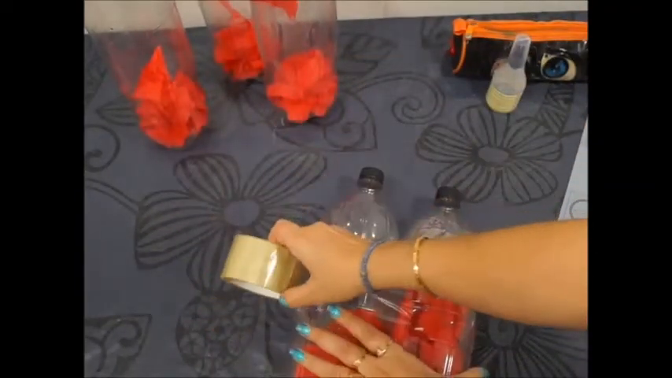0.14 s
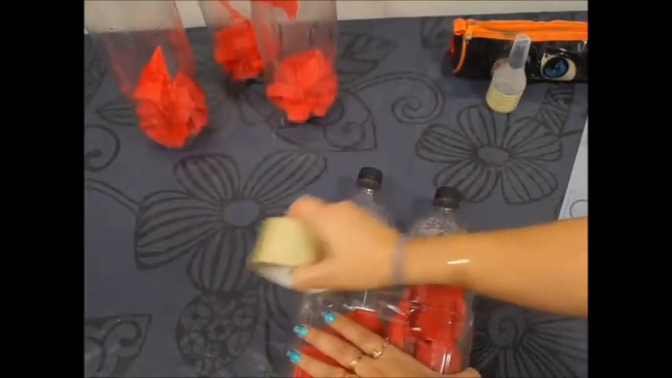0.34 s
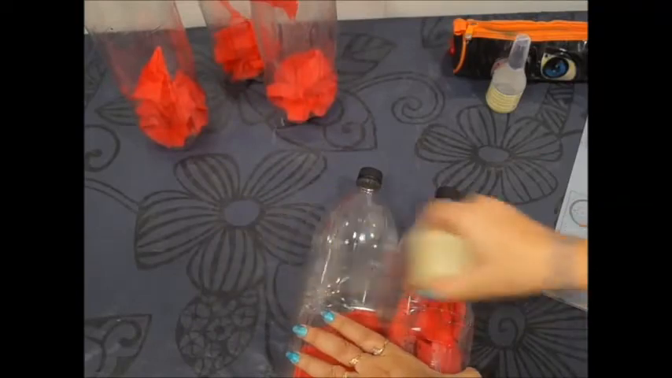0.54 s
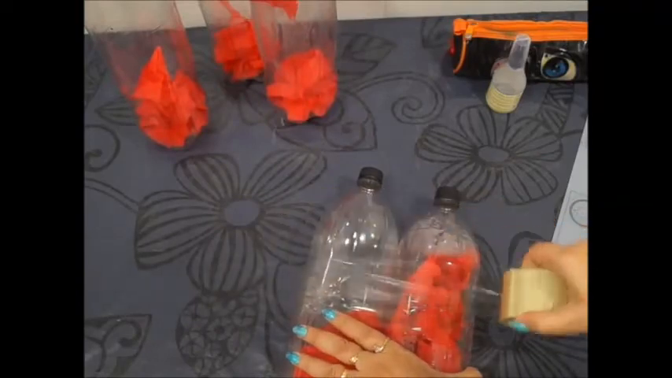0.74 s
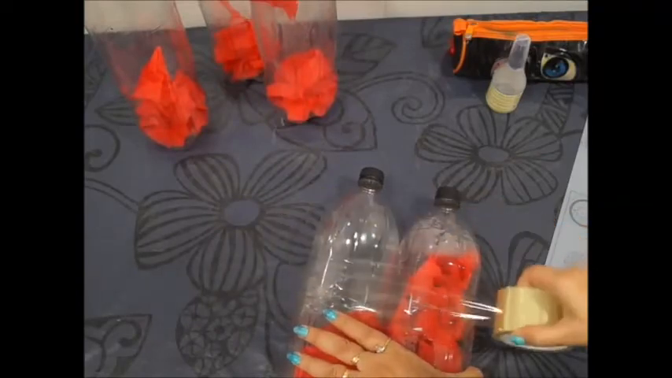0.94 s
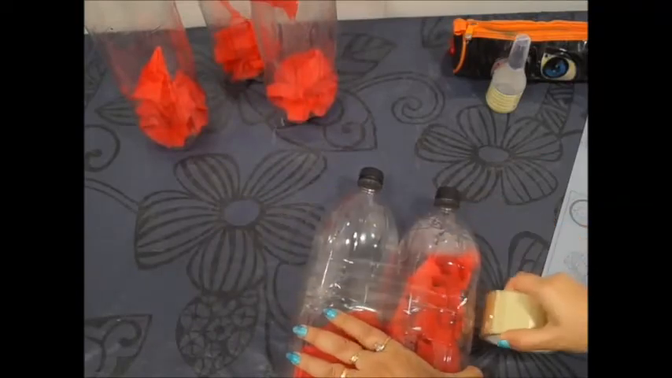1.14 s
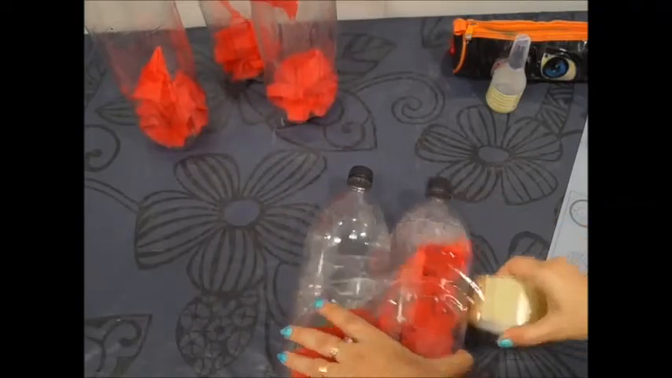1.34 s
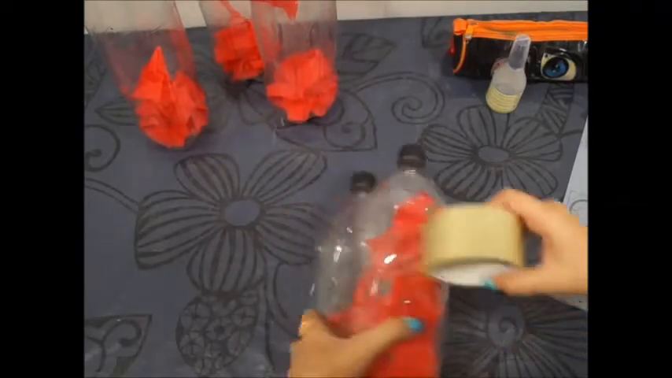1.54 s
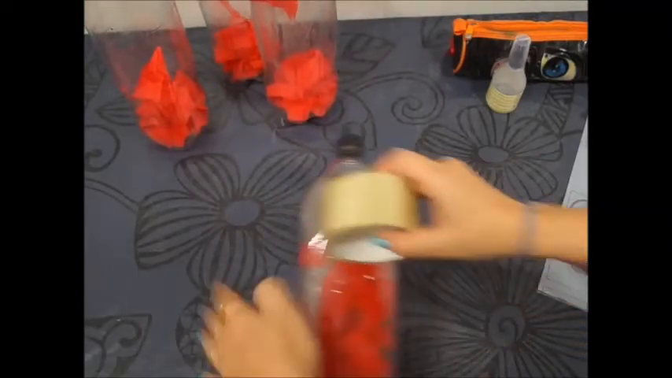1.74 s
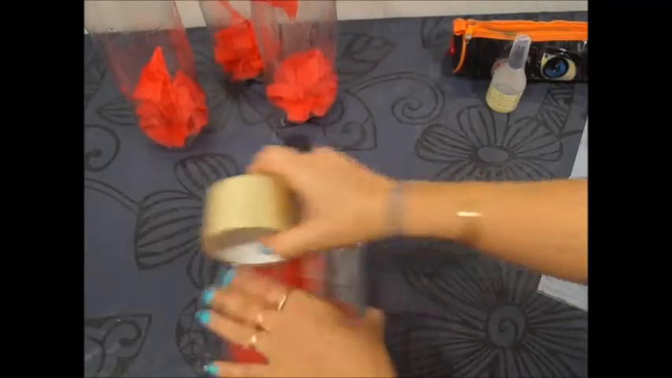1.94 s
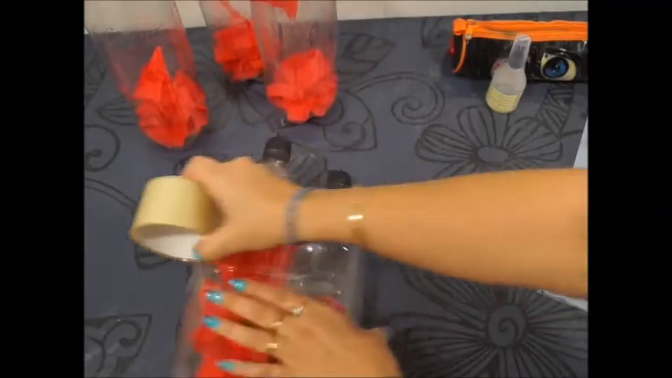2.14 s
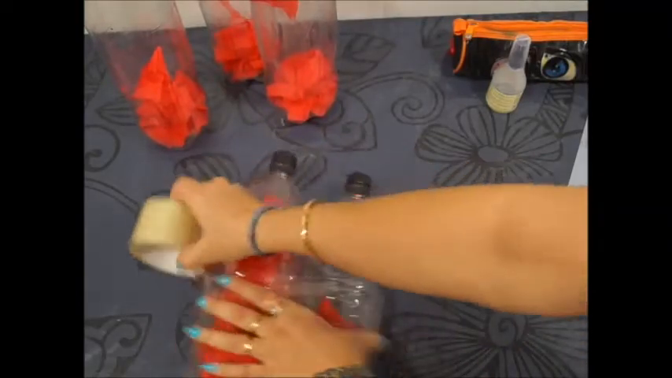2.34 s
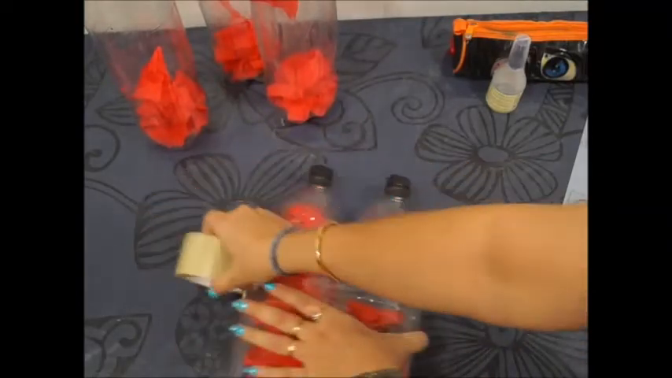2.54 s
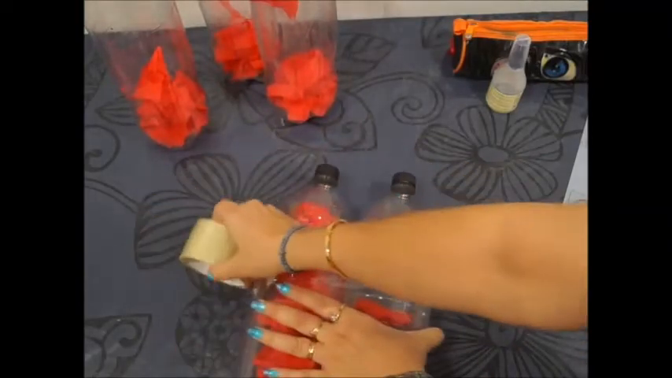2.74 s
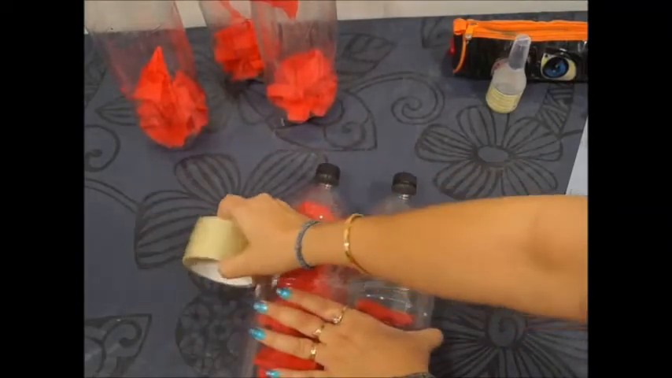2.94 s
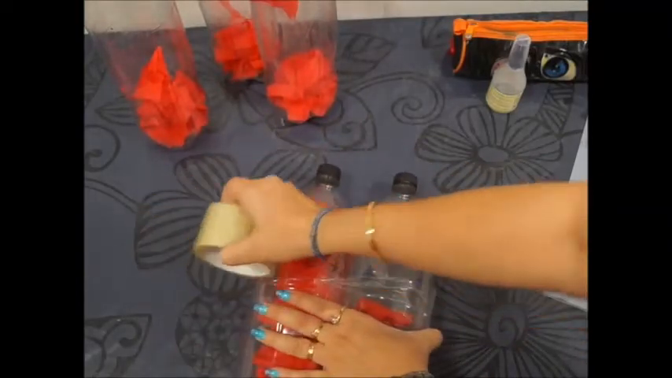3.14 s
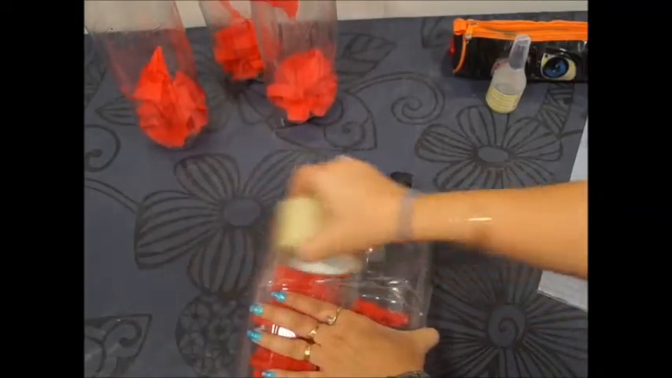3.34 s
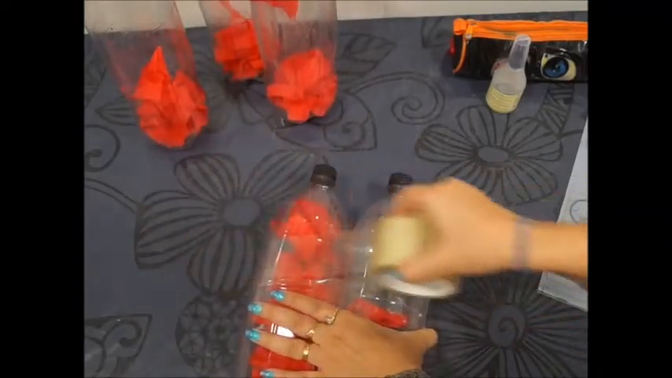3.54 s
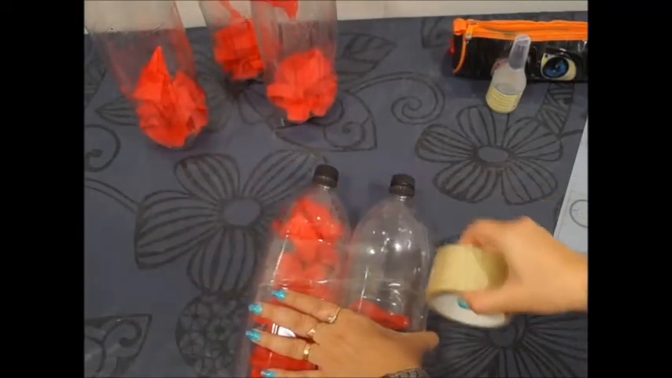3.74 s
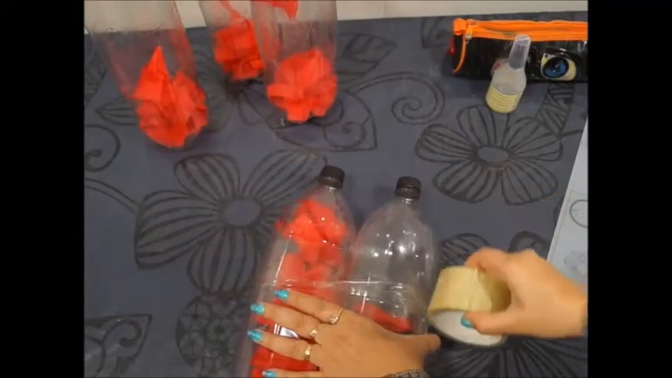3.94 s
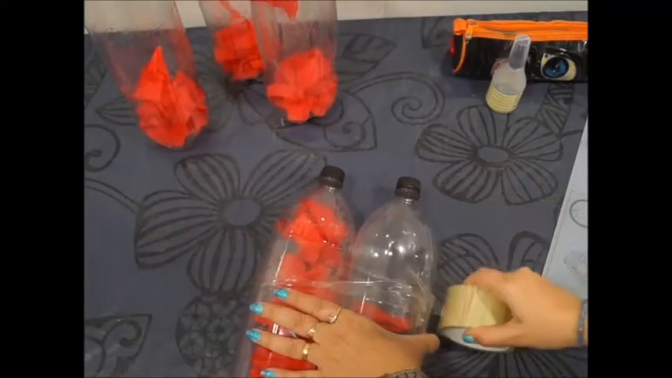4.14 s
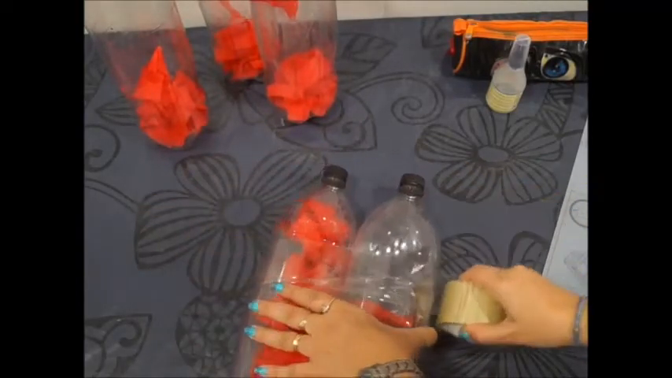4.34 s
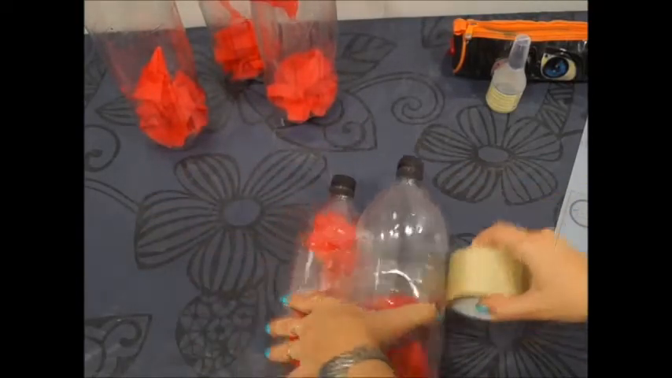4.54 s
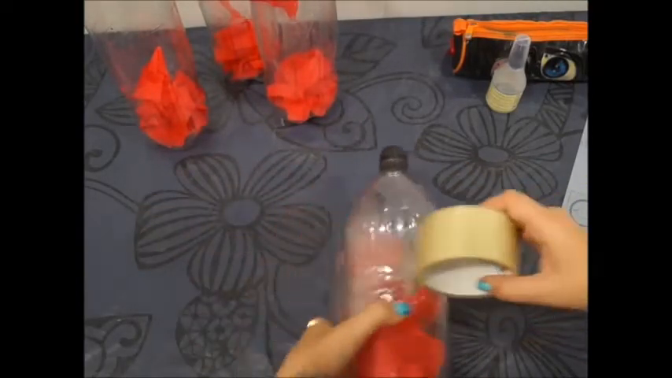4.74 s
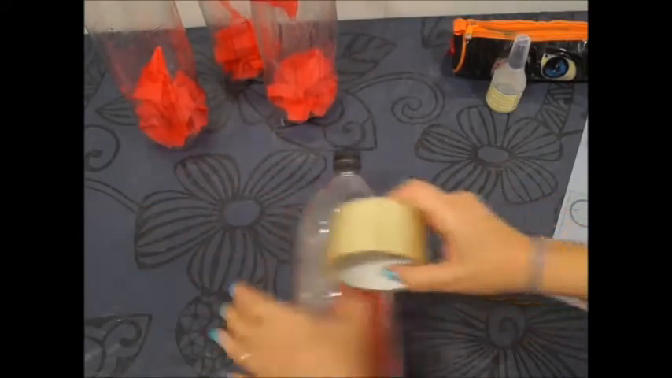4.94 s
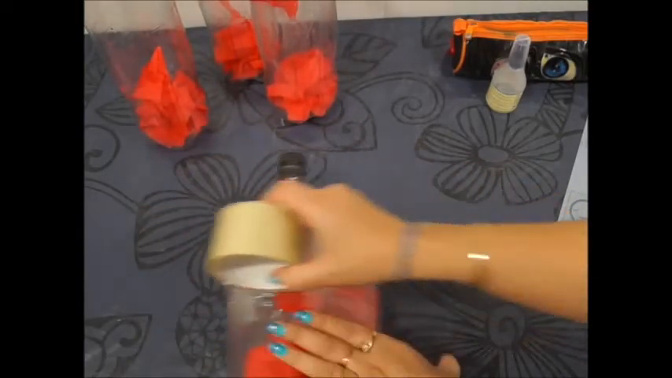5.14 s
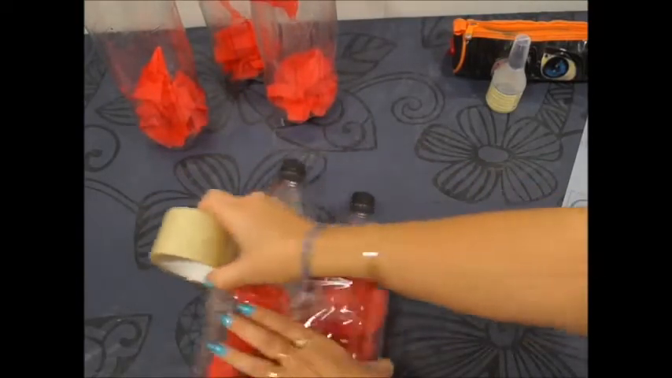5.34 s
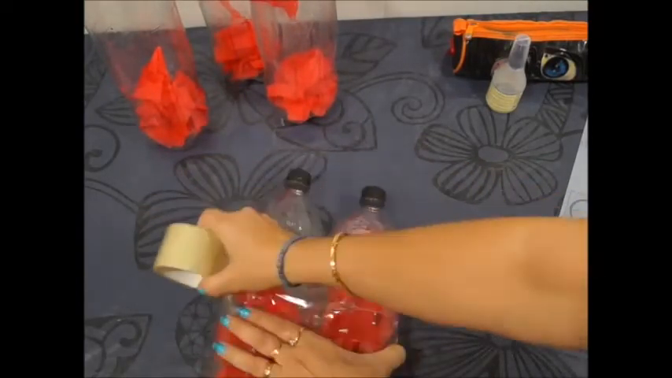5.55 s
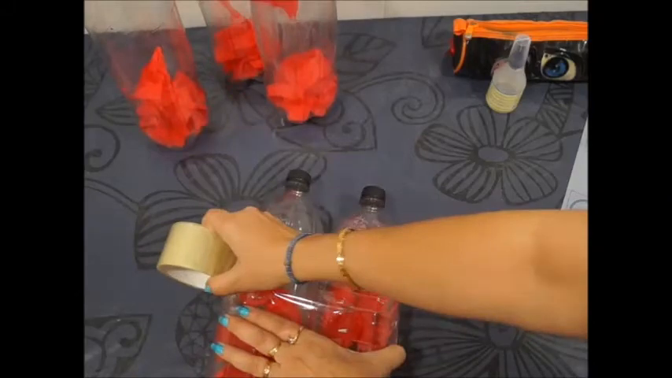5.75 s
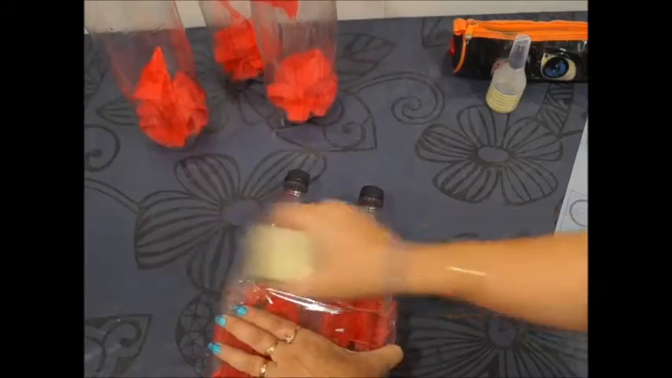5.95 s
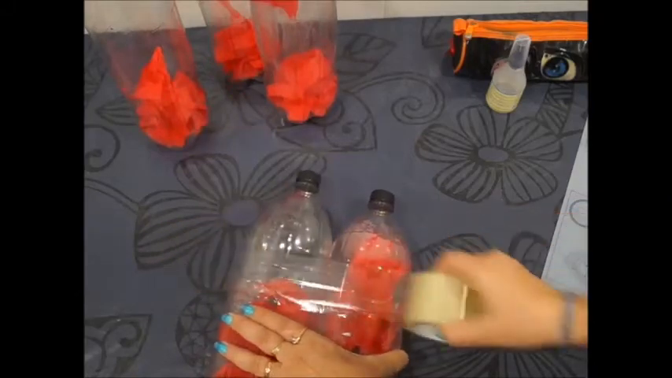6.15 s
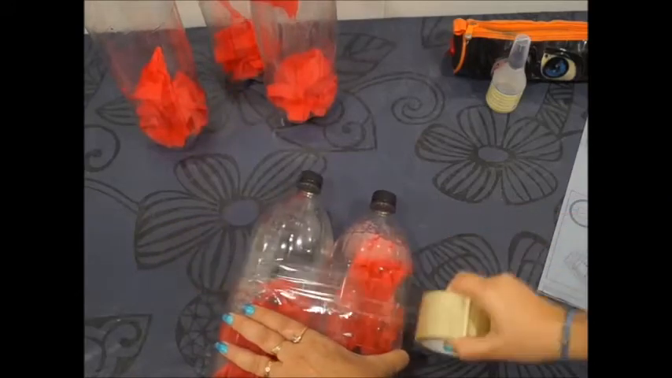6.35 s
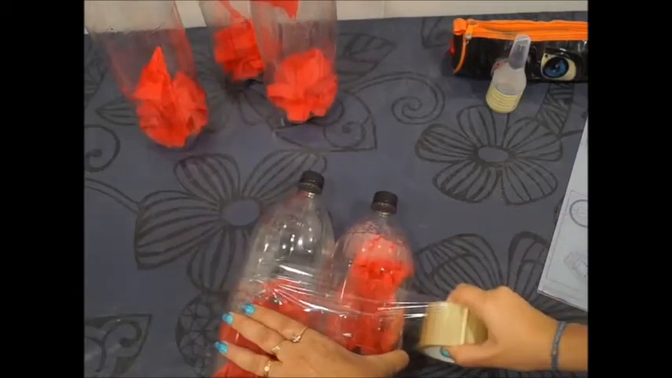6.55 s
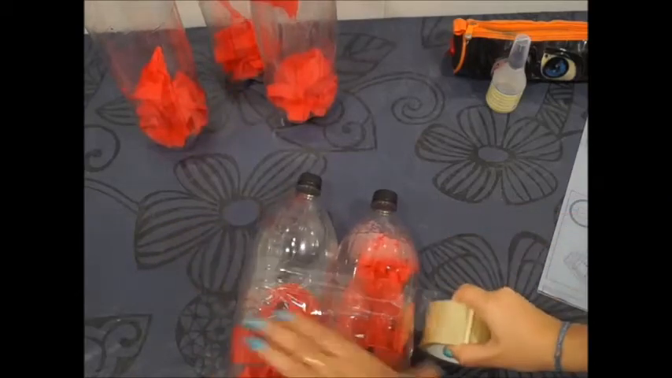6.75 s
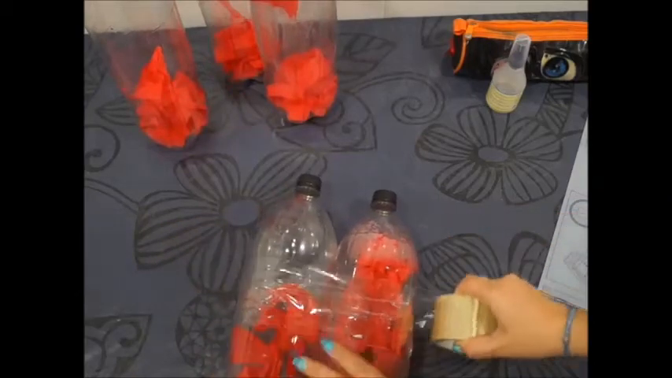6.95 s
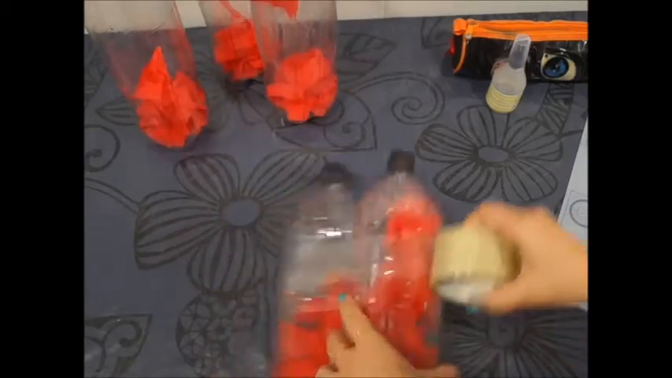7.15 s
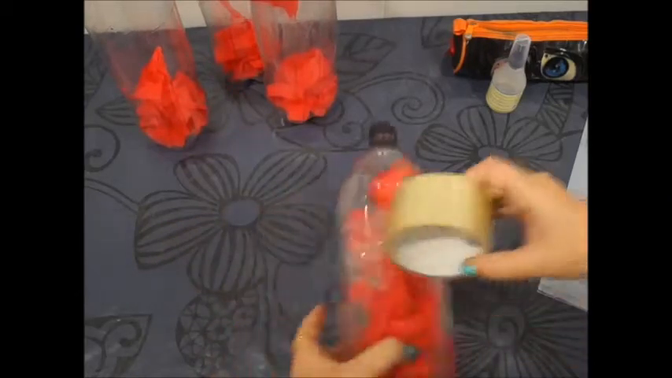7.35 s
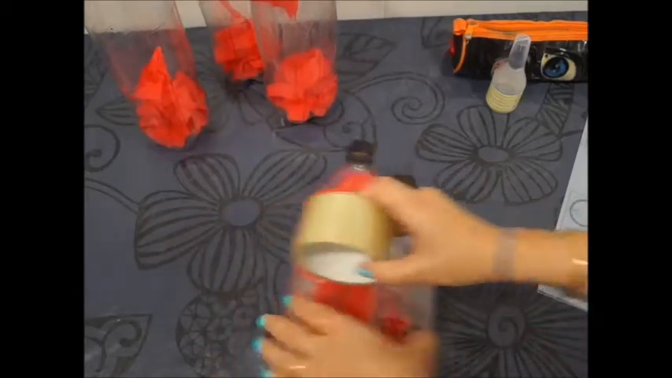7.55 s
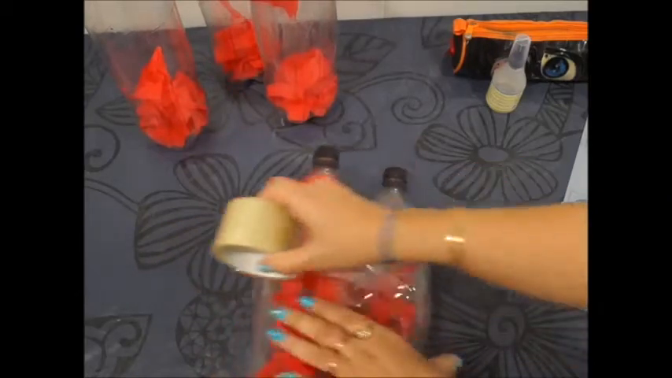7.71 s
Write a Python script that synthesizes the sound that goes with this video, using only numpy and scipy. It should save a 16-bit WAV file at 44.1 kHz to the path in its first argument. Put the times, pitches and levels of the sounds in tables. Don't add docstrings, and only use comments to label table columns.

```python
import sys
import numpy as np
from scipy import signal
from scipy.fft import rfft, irfft
from scipy.io import wavfile
from scipy.ndimage import uniform_filter1d

SR = 44100
rng = np.random.default_rng(int(sys.argv[2]) if len(sys.argv) > 2 else 0)


def rack_gain(trim_db):
    fader = np.asarray(trim_db, float)
    return 10 ** (fader / 20)


def bounce(signal):
    frames = np.transpose(np.atleast_2d(signal))
    limited = np.clip(frames, -1, 1)
    pcm = np.round(limited * 32767).astype(np.int16)
    wavfile.write(sys.argv[1], SR, pcm)


N = 343098


def unit_rms(x):
    return x / np.sqrt(np.mean(x ** 2) + 1e-20)


def at_hz(points, hz, column=1):
    points = np.array(points)
    return np.interp(np.log(hz), np.log(points[:, 0]), points[:, column])


def colour(x, spectrum):
    hz = np.arange(1, 2050) * SR / 4096
    cepstrum = irfft(np.log(rack_gain(at_hz(spectrum, hz))))
    cepstrum[1:2048] *= 2
    cepstrum[2049:] = 0
    kernel = irfft(np.exp(rfft(cepstrum)))[:2048]
    return signal.oaconvolve(x, kernel / np.linalg.norm(kernel))[:N]


def drift(rate_hz):
    r = np.exp(-2 * np.pi * rate_hz / SR)
    return unit_rms(signal.lfilter([1], [1, -2 * r, r * r], rng.standard_normal(N)))


def grains(per_s, spread_db):
    size_db = spread_db * np.minimum(rng.exponential(1, N), 5)
    sizes = rack_gain(size_db) * rng.choice([-1, 1], N)
    return unit_rms(sizes * (rng.random(N) < per_s / SR))


# pitch in Hz, width in Hz, level in dB.
BOTTLES = [(807.4, 71, -1), (1072, 52, -4), (1340, 45, -6.5), (1580, 142, -7), (2050, 20, -4.5),
           (2400, 34, -18)]


def bottles(x, ring_db):
    out = x
    for hz, width_hz, db in BOTTLES:
        r = np.exp(-np.pi * width_hz / SR)
        b = np.array([1, 0, -1]) * (1 - r * r) / 2
        a = [1, -2 * r * np.cos(2 * np.pi * hz / SR), r * r]
        out = out + rack_gain(db + ring_db) * signal.lfilter(b, a, x + 1e-18)
    return out


# start in seconds, end in seconds, level in dB, slips per second in Hz, evenness in dB.
RUNS = [(0.292, 0.371, -21, 1030, 3.5), (0.369, .412, -23, 1400, 3), (.412, 0.45, -21.5, 2058, 4),
        (.45, .533, -21, 1452, 3), (0.53, 0.564, -21.5, 1000, 0), (3.0463, 3.166, -23, 1000, -0.5),
        (3.177, 3.226, -25.5, 902.4, -1.5), (3.228, 3.321, -21, 1200, 1), (3.326, 3.373, -23.5, 1340, -1),
        (3.396, 3.448, -23.5, 1104, -1.5), (3.456, 3.53, -26.5, 1000, -2), (5.864, 5.992, -22.5, 1148, 0.5),
        (5.992, 6.059, -22.5, 1337, 1), (6.058, 6.125, -25.5, 1402, 0)]
# start in seconds, length in ms, level in dB, slips per second in Hz.
JERKS = [(.588, 14.6, -19.5, 1340), (.641, 21.4, -22, 1301), (.687, 17, -20.5, 1388),
         (.729, 23.4, -24, 892.3), (.767, 10.7, -27.5, 1102), (3.533, 19.7, -19.5, 1553),
         (3.572, 21.3, -21.5, 1543), (3.623, 25.9, -20, 1200), (3.658, 22.1, -27, 1100),
         (3.68, 20.4, -19.5, 1200), (3.722, 5.53, -26, 1000), (3.743, 8, -31, 1000),
         (6.137, 20.4, -17, 1254), (6.172, 18, -23.5, 1200), (6.199, 16.35, -30, 1103),
         (6.237, 8.75, -24, 1200)]
# start in seconds, length in ms, level in dB.
CREEPS = [
    (.276, 16.8, -48),
    (.284, 7.9, -34),
    (3.037, 5, -48),
    (3.993, 6.84, -49.5),
    (5.49, 29, -55),
    (5.762, 18.85, -57),
    (7.428, 24, -47),
]
# start in seconds, length in ms, level in dB, slips per second in Hz, film against crackle in dB.
TUGS = [
    (4.0189, 13.1, -16.5, 900, -3),
    (4.038, 21.8, -19, 1000, -1.5),
    (4.066, 26, -22, 749, 2),
    (5.783, 9.85, -31.5, 1000, 2),
    (5.798, 12.16, -31.5, 1000, -7),
    (5.825, 15.2, -16.5, 1097, 2.5),
    (6.4143, 10, -16.5, 902, -1.5),
    (6.431, 5, -9, 902, -8),
    (6.446, 25.8, -21, 899, -0.5),
    (7.455, 17.7, -29, 520, -5.5),
]
RUN_BUZZ_DB, RUN_RASP_DB, EVEN_SILENCES_RASP = -4.5, -2, 2.65
JERK_BUZZ_DB, JERK_RASP_DB = -6.5, -0.37
CREEP_HZ = 1000


def peel_rows():
    rows = []
    for start, end, db, hz, even_db in RUNS:
        buzz_db = db + RUN_BUZZ_DB + even_db
        rasp_db = db + RUN_RASP_DB - EVEN_SILENCES_RASP * even_db
        rows.append((start, end, db, buzz_db, hz, rasp_db))
    short = [row + (CREEP_HZ, 0) for row in CREEPS] + [row + (0,) for row in JERKS] + TUGS
    for start, ms, db, hz, film_db in short:
        film = db + film_db
        rows.append((start, start + ms / 1000, db, film + JERK_BUZZ_DB, hz, film + JERK_RASP_DB))
    return rows


# frequency in Hz, level in dB per Hz.
CRACKLE = [(100, -68), (500, -37.5), (1200, -19.5), (2200, -5.5), (4500, -5.5), (7000, -8.5), (11000, -11)]
# frequency in Hz, level in dB per Hz.
BUZZ = [(80, -71), (300, -37), (700, 1), (1000, -2), (1600, -5), (2500, -14), (4000, -14.5), (11000, -36)]
# frequency in Hz, level in dB per Hz.
RASP = [(40, -38), (120, -18.5), (300, -10), (600, -5), (900, -2), (1600, -3), (2500, -4), (5000, -14),
        (11000, -47.5)]


def peeling():
    t = np.arange(N) / SR
    levels = np.zeros((3, N))
    slip_hz = np.full(N, 1000.)
    for start, end, crackle_db, buzz_db, hz, rasp_db in peel_rows():
        near = slice(round(start * SR) - 100, round(end * SR) + 100)
        inside = np.minimum(t[near] - start, end - t[near])
        gate = np.clip(inside / 0.00093 + .5, 0, 1)
        levels[:, near] += gate * rack_gain(np.array([[crackle_db], [buzz_db], [rasp_db]]))
        slip_hz[round(start * SR):round(end * SR)] = hz
    unsteady = rack_gain(.7 * drift(30) + .8 * drift(300))
    turns = np.cumsum(slip_hz * unsteady / SR)
    jerks = np.diff(np.floor(turns), prepend=0)
    even = unit_rms(jerks - uniform_filter1d(jerks, size=120))
    uneven = unit_rms(jerks * rng.standard_normal(N))
    threads = unit_rms(grains(8000, 3.3) * (.4 + np.cos(np.pi * turns) ** 2))
    crackle, buzz, rasp = levels * rack_gain(2.2 * drift(50) + 1.8 * drift(130))
    film = colour(buzz * even, BUZZ) + colour(rasp * uneven, RASP)
    return colour(crackle * threads, CRACKLE) + bottles(film, ring_db=7.5)


# time in seconds, peak in dB, dull part in dB, length in ms, brightest frequency in Hz.
CRACKS = [
    (0.9834, -4, -23, 1.944, 3260),
    (4.8992, -14.5, -39, 6, 2800),
    (5.2097, -22, -39.5, 3.3, 1990),
]
# time in seconds, peak in dB, brightest frequency in Hz.
TICKS = [(0.0795, -34.5, 2400), (.225, -45, 2200), (1.2928, -43, 2900), (1.345, -39, 4100),
         (1.7045, -29, 2920), (1.8568, -46.5, 3400), (2.2523, -41.5, 3900), (2.41, -48, 2400),
         (2.6364, -41, 4300), (2.833, -30, 3900), (2.9196, -21.5, 2667), (4.346, -27.5, 2400),
         (4.379, -26.5, 6000), (4.6519, -36, 2300), (5.4754, -37, 2400), (5.5913, -29.5, 1800),
         (5.7835, -27, 3000), (6.7746, -37.5, 2394), (6.9438, -38, 1990), (7.0085, -32, 2400),
         (7.0857, -24.5, 2100), (7.0951, -23.5, 2070), (7.1826, -25.5, 3400), (7.2639, -26, 6000),
         (7.2803, -20, 7300), (7.2998, -31, 2700), (7.317, -18, 4200)]
TICK_MS, TICK_DULL_DB, DULL_FOLLOWS = 3.16, -34, .55
# time in seconds, dull part in dB.
DENTS = [(0.1114, -41.5), (1.2054, -48), (1.397, -43), (2.297, -46.5), (2.4436, -39), (2.902, -39),
         (5.5181, -41.5), (6.6498, -41), (6.9582, -44.5), (4.6517, -46), (7.0961, -44.5), (7.43, -42),
         (7.462, -34), (7.739, -58), (7.7572, -65)]
DENT_MS, DENT_SHARP_DB, DENT_HZ = 4.6, 3, 2800


def snap_rows():
    ticks = [(s, db, TICK_DULL_DB + DULL_FOLLOWS * db, TICK_MS, hz) for s, db, hz in TICKS]
    dents = [(s, db + DENT_SHARP_DB, db, DENT_MS, DENT_HZ) for s, db in DENTS]
    return ticks + dents + CRACKS


# frequency in Hz, level in dB per Hz.
SNAP = [(80, -50), (600, -33), (1200, -4), (2000, -8), (3200, -5.5), (5500, -5.5), (11000, -10)]
# frequency in Hz, level in dB per Hz.
THUD = [(60, -20), (150, -13.5), (350, -4), (800, 2.5), (1300, -2), (2500, -8.5), (11000, -26.5)]


def snaps():
    sharp, dull = np.zeros(N + 4000), np.zeros(N + 4000)
    run = np.arange(4000) / SR
    cracks, knocks = grains(12000, 3.1), rng.standard_normal(N + 4000)
    for s, peak_db, dull_db, length_ms, hz in snap_rows():
        i = round(s * SR)
        fading = np.exp(-run * 1000 / max(length_ms, .2))
        burst = .065 * np.resize(cracks[i:], 4000) * fading
        burst[0] = 1
        panel = signal.lfilter(*signal.iirpeak(hz, 1.5, SR), burst)
        sharp[i:i + 4000] += rack_gain(peak_db + 5.0) * (burst + 0.94 * panel)
        slow_fading = fading[30:] ** 0.42
        dull[i + 30:i + 4000] += rack_gain(dull_db - 1.5) * knocks[i:i + 3970] * slow_fading
    return colour(sharp[:N], SNAP) + bottles(colour(dull[:N], THUD), ring_db=5.5)


# time in seconds, peak in dB, pitch in Hz.
BUMPS = [(0.114, -35.5, 266), (2.448, -47, 260), (4.1, -26.5, 272), (5.202, -45.5, 256),
         (5.524, -46.5, 226.3), (5.789, -32.5, 260.8), (5.827, -19.5, 274.1), (6.15, -33, 162.1),
         (6.419, -57, 174), (6.469, -33, 255.7), (7.088, -59, 266), (7.431, -29, 330),
         (7.456, -25.5, 268.2), (0.989, -29, 401), (7.44, -28, 478.7), (7.47, -27, 402),
         (2.904, -40, 901.6)]
# time in seconds, peak in dB, pitch in Hz.
BOOMS = [
    (0.122, -48, 132),
    (5.544, -48, 93),
    (5.859, -40, 148.2),
    (6.484, -51, 147.7),
    (7.474, -50, 75.5),
]


def bumps():
    out, run = np.zeros(N + 4000), np.arange(4000) / SR
    for s, peak_db, hz in BUMPS + BOOMS:
        swell = run * hz / 0.72
        shape = swell * np.exp(-swell)
        out[round(s * SR):][:4000] += rack_gain(peak_db + 2) * shape * np.sin(2 * np.pi * hz * run)
    return out[:N]


# loudest moment in seconds, rise in seconds, fall in seconds, level in dB, brightness in dB.
STROKES = [(0.0, .05, 0.098, -48, -1.5), (.26, 0.11, 0.026, -57, -7.5), (1.42, 0.27, .15, -53.5, -3),
           (1.6, 0.12, 0.14, -48, 0.7), (1.78, 0.089, 0.17, -66.5, 5), (2.149, 0.197, .1, -67, -6.5),
           (2.256, 0.074, 0.15, -51.5, -3), (2.42, 0.048, 0.17, -49.5, -1), (2.754, 0.1, 0.05, -47, 1.5),
           (2.97, .13, 0.097, -39.5, -2), (4.36, 0.01994, 0.05, -54, -3), (4.52, .2, 0.24, -53, -4),
           (4.74, 0.13, 0.097, -48.5, 5.5), (4.88, .04, 0.017, -67, -11), (5.311, 0.031, .1, -54, .4),
           (5.382, 0.053, 0.071, -49, -4.5), (5.56, 0.12, 0.13, -51, -1.5),
           (6.755, .02, 0.058, -50.5, -3.5), (6.87, 0.11, 0.099, -79, -4), (7.03, 0.079, .2, -51, -2.5),
           (7.25, 0.17, 0.0992, -63, -2.5), (7.37, .1, 0.0988, -46.5, 1), (7.51, 0.0596, 0.041, -44.5, 6),
           (7.68, 0.075, .15, -67, -10)]
STROKE_EDGE_DB = 13.5
HISS_DB, HISS_FOLLOWS = -2.5, .2
# frequency in Hz, level in dB per Hz.
HISS = [(710, -67), (1200, -13.5), (1720, -29), (2090, -2.5), (3150, 0), (3890, -8), (11000, -26),
        (14300, -45)]
# frequency in Hz, level in dB per Hz.
SWISH = [(2000, -28.5), (3500, -7.5), (4200, -5.5), (6000, -10), (8000, -13), (11000, -16.5)]


def rubbing():
    t, levels = np.arange(N) / SR, np.zeros((3, N))
    for s, rise, fall, db, bright_db in STROKES:
        shape = rack_gain(db - STROKE_EDGE_DB * np.maximum((s - t) / rise, (t - s) / fall))
        levels += shape * rack_gain(np.array([[HISS_DB + HISS_FOLLOWS * bright_db], [-bright_db], [bright_db]]))
    hiss, hollow, swish = levels * rack_gain(np.array([[-12], [-14], [-10]]) + 1.8 * drift(23))
    bright = colour(hiss * grains(3300, 5.0), HISS) + colour(swish * grains(9000, 2.0), SWISH)
    return bright + bottles(colour(hollow * grains(1500, 1.9), THUD), ring_db=7.0)


# delay in ms, left level in dB, right level in dB.
ECHOES = [(2.2, 1, -2.5), (4.4, -2.5, 1), (5.3, -3, -9), (8.4, -4, -1.5), (13.5, -11, -7)]
# frequency in Hz, time to fall by 60 dB in seconds, likeness of left and right from 0 to 1.
TAIL = [(40, .55, .9), (100, 0.31, 1), (250, 0.42, 1), (597, 0.39, 0.82), (1200, 0.51, 0.74),
        (2700, 0.47, 0.39), (6000, 0.44, 0.71), (10500, 0.32, 0.58)]
TAIL_DB = 2.6


def room(x):
    t, places = np.arange(36000) / SR, 2
    edges = 60 * 2 ** np.arange(0, 8.1, .5)
    tails = np.zeros((2, places, len(t)))
    white = rng.standard_normal((2, 2, places, len(t)))
    for k, (low, high) in enumerate(zip(edges, edges[1:])):
        band = signal.butter(2, [low, high], "band", fs=SR, output="sos")
        mid, side = signal.sosfilt(band, white[k % 2])
        hz = np.sqrt(low * high)
        t60 = at_hz(TAIL, hz)
        alike = np.clip(at_hz(TAIL, hz, column=2), 0, 1)
        dying = rack_gain(TAIL_DB - 60 * t / t60) / np.sqrt(t60 * SR / (2 * np.log(1000)))
        tails += dying * (np.sqrt(1 + alike) * mid + np.sqrt(1 - alike) * side * [[[1]], [[-1]]])
    tails *= 1 - np.exp(-(t / .008) ** 2)
    shares = np.array([drift(3) for _ in range(places)])
    shares /= np.linalg.norm(shares, axis=0)
    out = x + signal.fftconvolve((x * shares)[None], tails, axes=2)[:, :, :N].sum(axis=1)
    for delay_ms, left_db, right_db in ECHOES:
        lag = delay_ms * SR / 1000 * (1 + .03 * drift(1.5))
        echo = x[np.clip(np.arange(N) - lag.astype(int), 0, N - 1)]
        out += rack_gain(np.array([[left_db], [right_db]])) * echo
    return out


# frequency in Hz, level in dB per Hz.
AIR = [(25, -2), (60, -3), (150, -6.5), (400, -4.5), (850, -9), (1500, -13.5), (4000, -18), (11000, -26)]
AIR_DB = -65
# pitch in Hz, level in dB.
MOTOR = [(97, -73), (99, -74)]


def background():
    t = np.arange(N) / SR
    mid, side = (colour(rng.standard_normal(N), AIR) for _ in range(2))
    hum = sum(rack_gain(db) * np.sin(2 * np.pi * hz * t + 2.3) for hz, db in MOTOR)
    return rack_gain(AIR_DB + 1.5) * (mid + .25 * side * [[1], [-1]]) + hum


def scene():
    table = rack_gain(-5.0) * peeling() + snaps() + bumps() + rubbing()
    balance = rack_gain(np.array([[.3], [-.3]]))
    return room(table) * balance + background()


def gain_control(x, knee_db, share, release_db_per_s):
    level_db = 10 * np.log10(uniform_filter1d(np.mean(x ** 2, axis=0), size=130) + 1e-12)
    ramp = release_db_per_s * np.arange(N) / SR
    held_db = np.maximum.accumulate(level_db + ramp) - ramp
    gain_db = -np.clip(share, 0, .8) * np.maximum(held_db - knee_db, 0)
    return x * rack_gain(uniform_filter1d(gain_db, size=130))


def low_pass(x):
    return signal.sosfilt(signal.butter(12, 12380, fs=SR, output="sos"), x)


NOTCH_HZ, NOTCH_WIDTH_HZ = 3168, 69
LOW_CUT_HZ, LOW_CUT_SHARE = 137, 0.38
CUTOFF_HZ = 11050


def record(dry):
    x = gain_control(dry, knee_db=-21.5, share=0.28, release_db_per_s=147)
    x = .7 * np.tanh(x / .7)
    x = x - LOW_CUT_SHARE * signal.lfilter(*signal.butter(1, LOW_CUT_HZ, fs=SR), x)
    x = signal.lfilter(*signal.iirnotch(NOTCH_HZ, NOTCH_HZ / NOTCH_WIDTH_HZ, SR), x)
    x = signal.sosfilt(signal.ellip(10, .5, 44, CUTOFF_HZ, fs=SR, output="sos"), x)
    return low_pass(x)


dry = scene()
out = record(dry)
bounce(out)
```